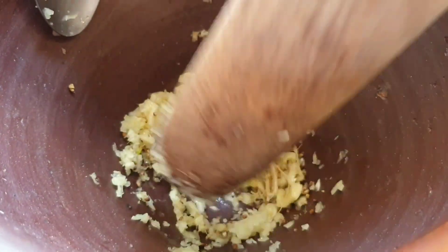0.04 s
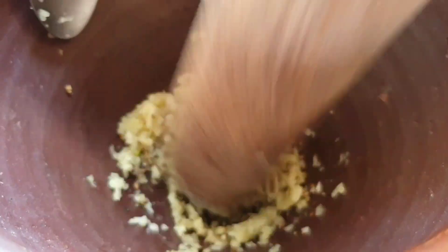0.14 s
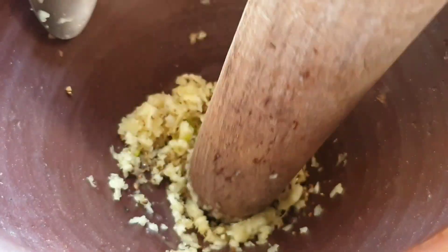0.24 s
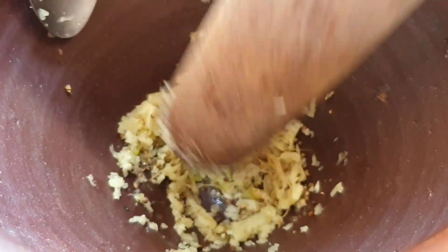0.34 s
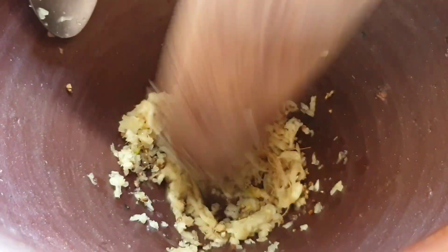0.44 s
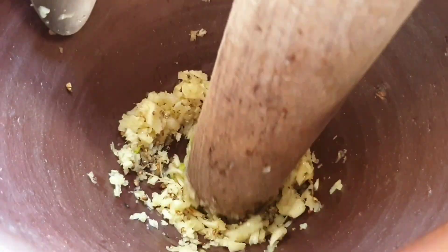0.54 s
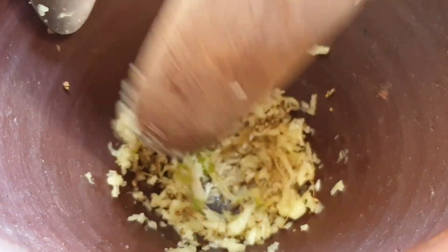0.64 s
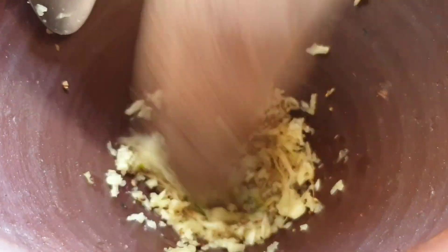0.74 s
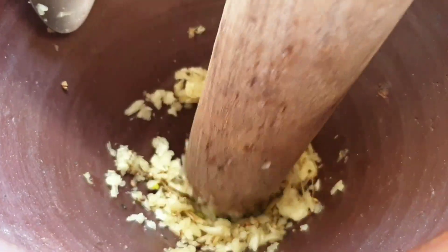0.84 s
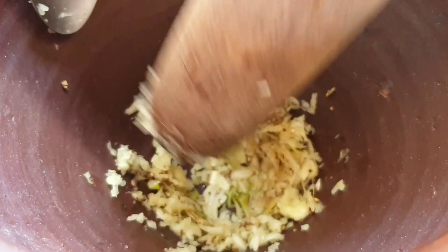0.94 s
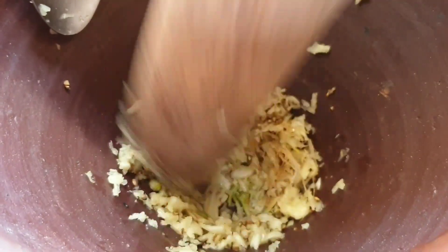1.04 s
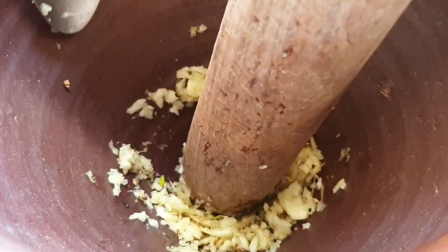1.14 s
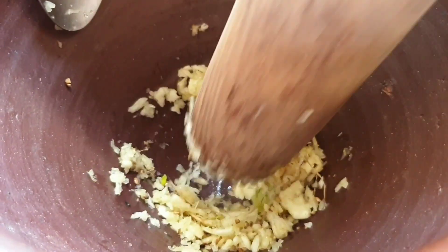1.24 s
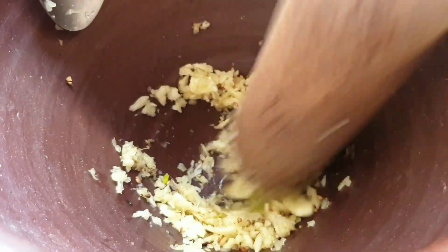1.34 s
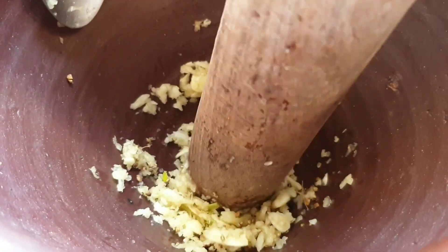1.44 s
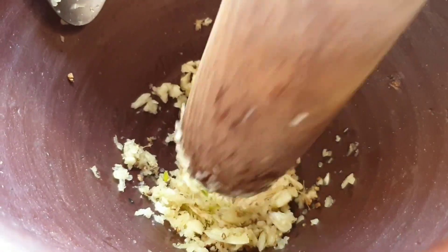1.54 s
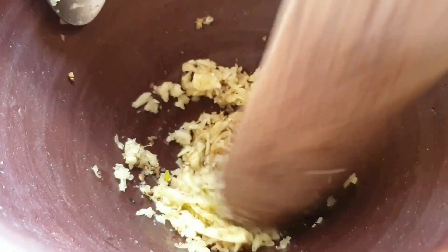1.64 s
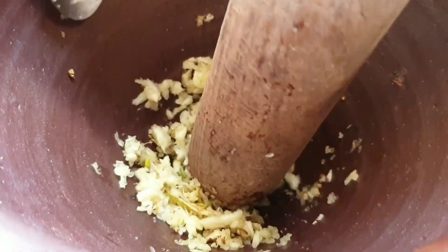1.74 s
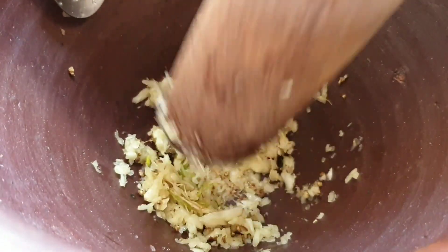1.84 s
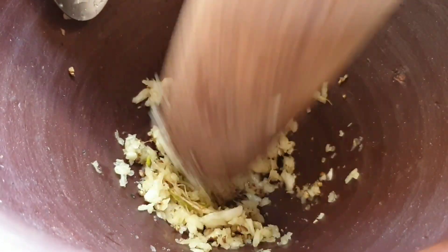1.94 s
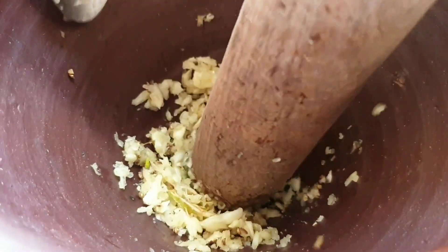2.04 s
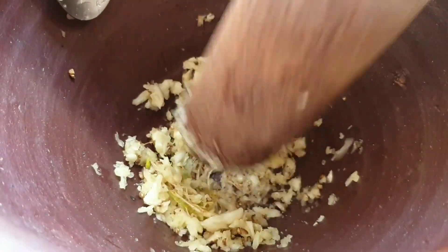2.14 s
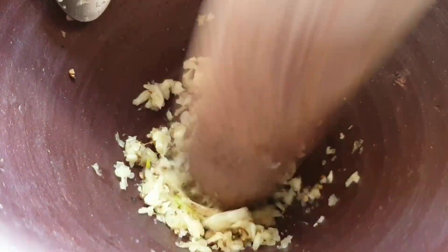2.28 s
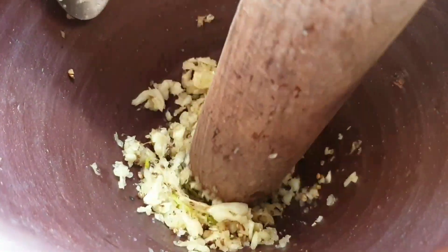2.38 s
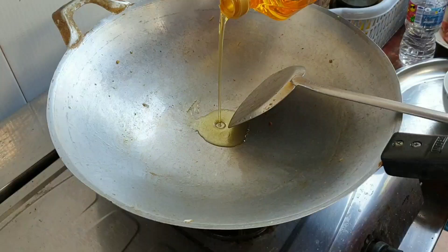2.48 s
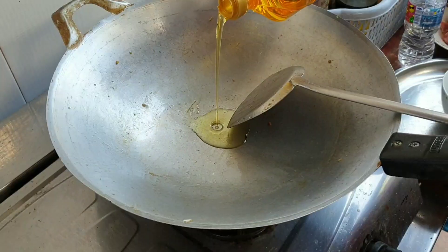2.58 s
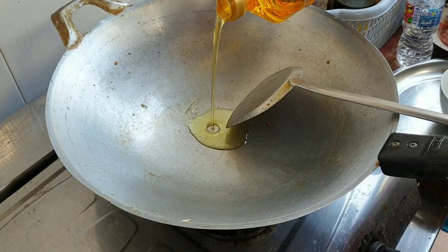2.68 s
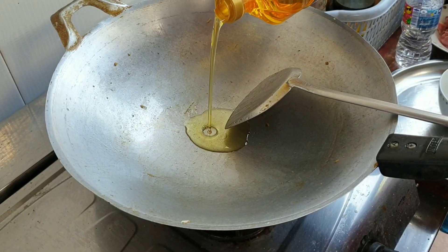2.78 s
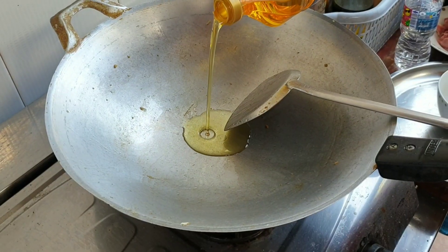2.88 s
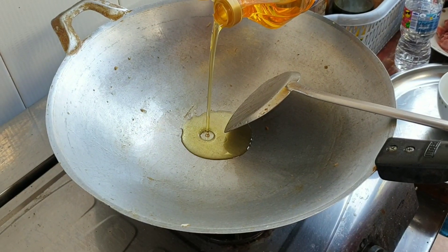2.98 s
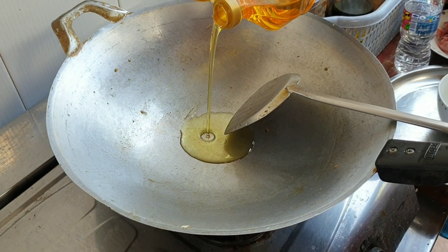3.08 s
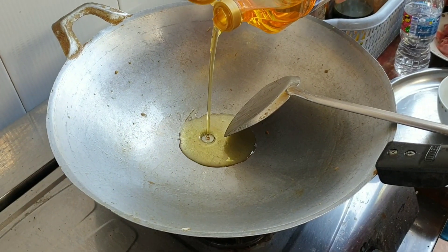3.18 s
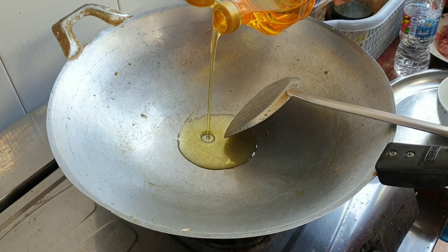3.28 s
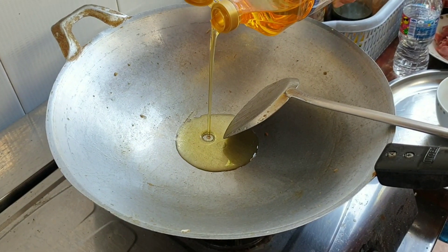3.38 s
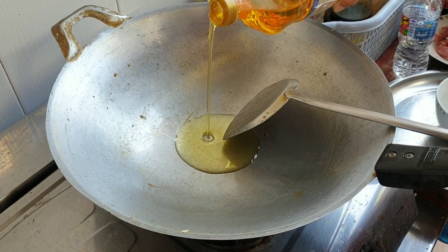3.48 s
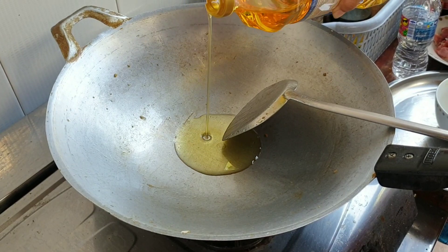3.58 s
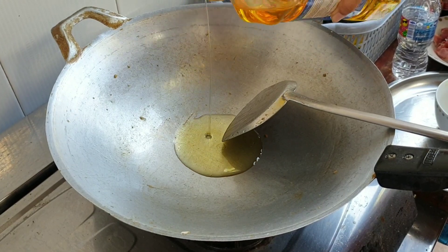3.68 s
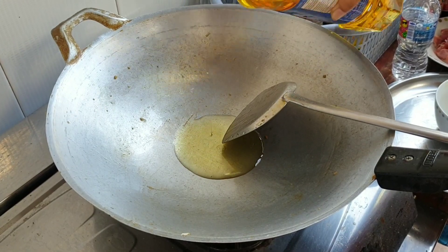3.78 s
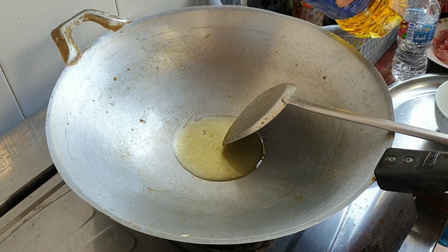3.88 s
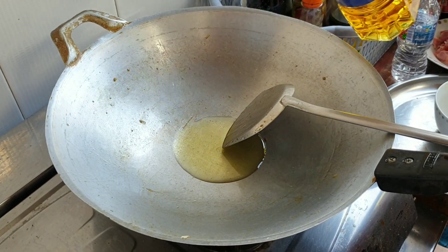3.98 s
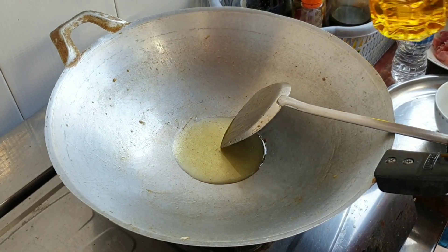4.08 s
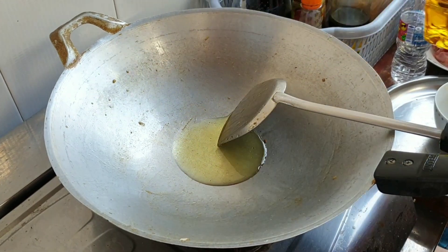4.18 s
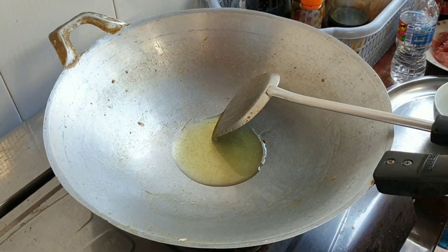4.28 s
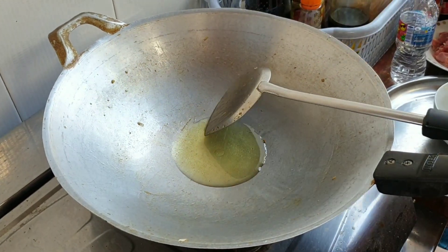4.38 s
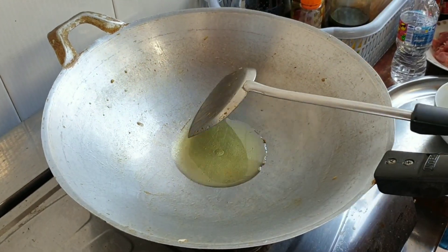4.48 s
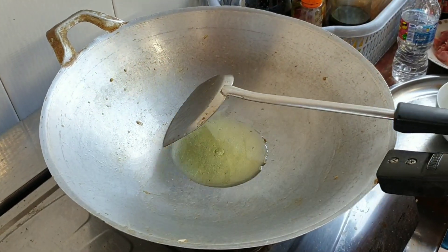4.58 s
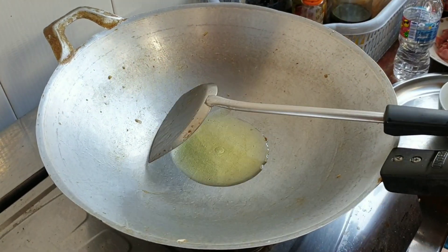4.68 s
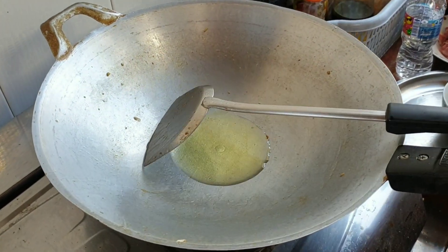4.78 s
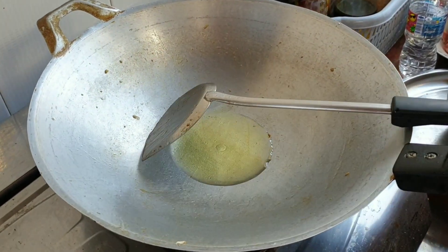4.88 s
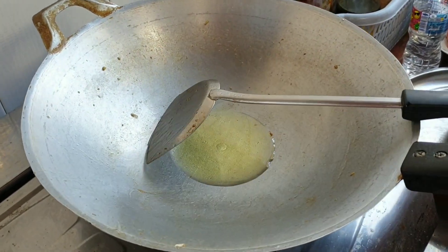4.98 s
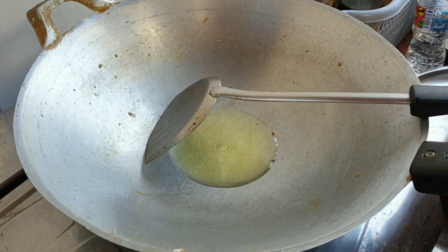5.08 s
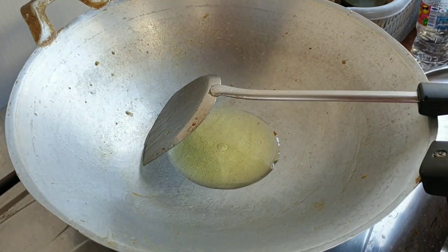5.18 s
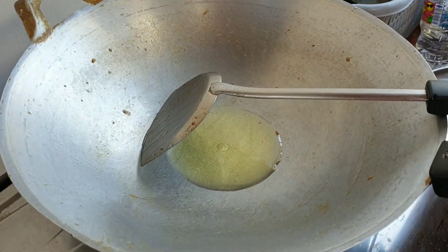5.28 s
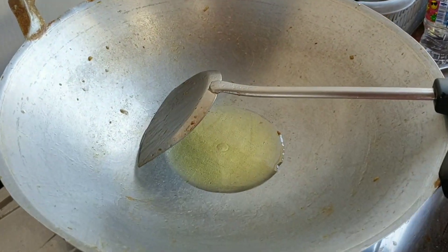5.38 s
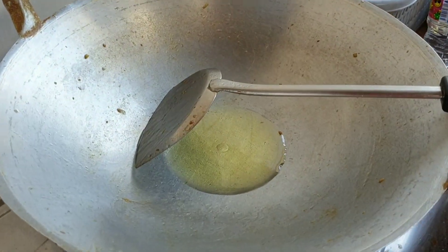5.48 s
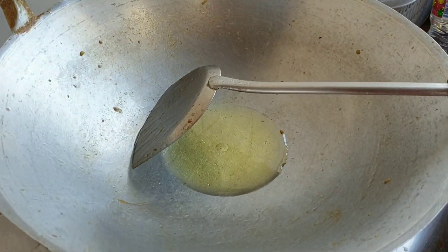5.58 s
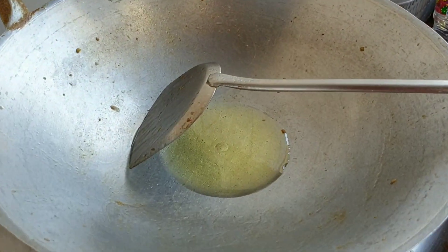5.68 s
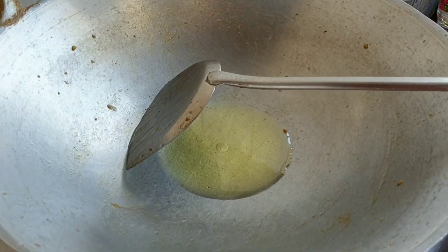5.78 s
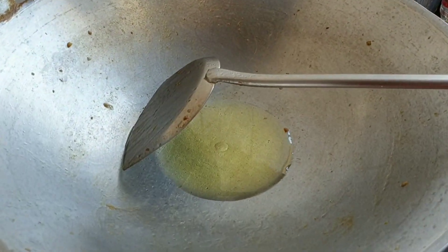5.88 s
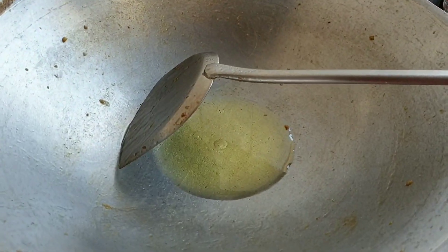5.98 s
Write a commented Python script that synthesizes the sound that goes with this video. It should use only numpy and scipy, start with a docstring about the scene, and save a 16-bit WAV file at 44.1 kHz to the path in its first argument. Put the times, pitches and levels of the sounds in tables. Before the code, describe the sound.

From 0 to 2.5 seconds a wooden pestle pounds garlic in a clay mortar, very close and slightly left, in a short-reverberating kitchen. Nine blows come roughly every 0.3 seconds; those near 0.3, 2.1 and 2.4 are heaviest, the one near 0.6 is soft, and those around 1.2 to 1.8 have a clearer woody knock. Each brings a gritty, wet garlic crackle as the pestle sinks, and a dish often clinks afterwards; a spoon tings at 2.1. Faint bird notes appear near 1.7. At 2.55 a tiny dip cuts to a much quieter scene: low distant traffic, faint motor hum and many short gliding bird whistles echoing outdoors. Small dry ticks and soft brushing on steel cluster around 3.7 to 4.3. A ladle knocks ringingly at 4.8, a double clank on the wok follows at 5.05, birds continue, faint brushing comes near 5.9, and a final double tap lands at 6.0.

```python
"""A crack of garlic and a wooden pestle's thud in a clay mortar come first, close by in an open kitchen.
Blow follows blow: modes of clay and wood ring, bursting pulp crackles, a dish and a spoon clink beside it.
After a cut the same kitchen is heard by a wok: a ladle is taken up, brushes the steel and knocks it.
Small birds whistle gliding notes outside, echoed by hard walls; far traffic is wavering noise with a motor hum."""
import sys
import numpy as np
from scipy import signal
from scipy.fft import rfft, irfft
from scipy.io import wavfile

SR = 44100
rng = np.random.default_rng(int(sys.argv[2]) if len(sys.argv) > 2 else 0)


def unload_audio(sound):
    """Save the sound as a 16-bit wav file, at the path given as the first command line argument."""
    columns = np.transpose(np.atleast_2d(sound))
    # keep every value between -1 and 1, then stretch to whole-number steps
    steps = np.round(np.clip(columns, -1, 1) * 32767)
    wavfile.write(sys.argv[1], SR, steps.astype(np.int16))


N = 265923
T = np.arange(N) / SR   # seconds

# All levels are relative to the mix ahead of the cut's own gain; pan_db is left minus right.
# street, level over time: time_s, rumble_db, air_db
STREET_LEVELS = [(0, -54.5, -73.5), (2.551, -55.5, -64), (2.58, -54.5, -69), (3.5, -58.5, -68),
                 (5.001, -52, -65.5), (6.03, -57, -67.5)]
# spectrum of the far traffic: freq_hz, level_db_per_hz
RUMBLE_SPECTRUM = [(12, -62), (20, -38), (43, -10), (65, 0.5), (87, -14.5), (120, -12.5), (168, -22),
                   (280, -23.5), (343, -29.5), (403, -32.5), (500, -32.5), (650, -72), (1100, -120)]
# spectrum of the street air: freq_hz, level_db_per_hz
AIR_SPECTRUM = [(180, -41.5), (300, -5), (354, -18), (385, -17.5), (842, -5.5), (1080, -6.5), (2210, -12),
                (2610, -49.5), (5900, -40.5), (6740, -21), (16000, -33.5)]
# a far motor: time_s, pitch_hz, level_db
MOTOR_HUM = [(2.599, 148.5, -60), (2.9, 148.3, -57), (3.3, 147.8, -73), (5.2, 150, -59), (5.7, 159.2, -60),
             (6.03, 155.5, -61.5)]
# likeness of left and right in diffuse sound: freq_hz, likeness (1 = the same, 0 = unrelated)
STEREO_LIKENESS = [(60, 0.95), (130, 0.93), (290, 0.85), (640, 0.48), (1410, 0.04), (3100, -0.01),
                   (6820, 0.04), (15000, -0.03)]

# the clearest bird notes: start_s, length_s, first_hz, last_hz, level_db
BIRD_NOTES = [(.924, 0.071, 4930, 4350, -46), (1.356, 0.06, 3670, 4140, -60),
              (1.654, 0.015, 5240, 5570, -50), (1.673, 0.027, 3380, 4425, -36.5),
              (1.712, .057, 3470, 2990, -38), (1.73, .04, 4400, 4230, -45.5),
              (2.552, 0.038, 3970, 3300, -58.5), (2.723, 0.034, 3005, 2930, -57.5),
              (2.732, .11, 5040, 3500, -56.5), (2.791, 0.032, 3280, 2060, -50.5),
              (2.892, 0.09, 2655, 2240, -57), (2.952, 0.044, 6100, 5800, -58),
              (2.982, 0.05, 5460, 4720, -51.5), (3.048, 0.028, 5400, 4820, -42.5),
              (3.109, 0.069, 4690, 4600, -54.5), (3.107, 0.036, 2157, 1767, -53),
              (3.277, 0.03, 2800, 2040, -49.5), (3.725, 0.054, 4984, 4330, -47.5),
              (3.763, 0.026, 4540, 2620, -45), (3.805, 0.057, 3470, 3210, -49),
              (3.899, 0.051, 4750, 3750, -43.5), (3.986, 0.083, 3890, 3070, -51),
              (4.065, 0.039, 6240, 5100, -46), (4.134, 0.035, 5040, 4810, -41),
              (4.183, 0.027, 2580, 2420, -48.5), (4.357, 0.092, 6300, 5850, -52.5),
              (4.45, 0.077, 6010, 5970, -50.5), (4.439, 0.053, 5230, 4260, -54.5),
              (4.533, 0.028, 3680, 2120, -47), (4.622, 0.049, 4640, 4080, -51),
              (4.667, 0.022, 6050, 5830, -48), (4.668, 0.045, 3090, 3835, -47.5),
              (4.732, 0.036, 5590, 4290, -45.5), (4.87, 0.062, 4460, 3370, -46),
              (5.213, 0.057, 5604, 2380, -46.5), (5.293, 0.11, 6090, 5400, -52.5),
              (5.387, 0.04, 4070, 5360, -42.5), (5.669, 0.06, 3030, 5390, -46),
              (5.715, 0.029, 4650, 3210, -40), (5.735, 0.078, 1992, 3936, -45.5),
              (5.83, .052, 4170, 3280, -52)]
# chatter of more birds further off: time_s, level_db
FLOCK_LEVELS = [(0, -70.5), (1.6, -60), (1.9, -70), (2.5, -72), (2.7, -69), (3.0, -57.5), (3.3, -65),
                (3.5, -89.5), (3.7, -75.5), (3.9, -57), (4.3, -82), (4.5, -57), (4.9, -59.5), (5.3, -56.5),
                (5.55, -81), (5.75, -62.5), (6.03, -62)]
ARCH = .1   # mid-note pitch lies above the straight glide by this share of its span
YARD_T60_S, BIRD_DIRECT_DB = .65, -7

# decay of the kitchen: freq_hz, t60_s
KITCHEN_DECAY = [(60, 0.44), (250, 0.57), (1000, 0.43), (4000, 0.34), (12000, 0.22)]
KITCHEN_DB = -11

# ladle on the wok: start_s, ladle_ring_db, wok_ring_db, clank_db, clank_t60_s,
# clank_tilt_db_per_octave, contact_click_db
KNOCKS = [(4.815, -37, -64, -33, 0.24, -1.5, -19), (5.034, -55, -39, -25, 0.15, 4.5, -15),
          (5.065, -58, -36, -35, 0.26, 1.5, -30), (5.998, -68, -44, -25, 0.09, 5, -11),
          (6.010, -60, -40, -32, 0.074, 4, -14)]
# ringing modes of the ladle: freq_hz, level_db, t60_s
LADLE_MODES = [(230, -5, .3), (307, -5, .4), (415, -6, .3), (624, -8, .4), (728, 1, .65), (880, -7, .15),
               (1780, -8, .1), (2239, 0, .19), (2708, -4, .11), (4100, -6, .07), (4700, -4, .04)]
# ringing modes of the wok: freq_hz, level_db, t60_s
WOK_MODES = [(291, -9, .4), (520, -4, .45), (856, -5, .35), (1180, -5, .2), (1453, -4, .35),
             (1300, -3, .06), (1906, -3, .13), (3214, -4, .24), (3941, -8, .2), (4328, -8, .25),
             (5000, -2, .06), (5701, -4, .13)]
# dense modes of the thin steel: freq_hz, level_db_per_hz
CLANK_SPECTRUM = [(88, -36), (150, -8.5), (689, 2), (1630, -8), (2270, -10.5), (2550, -19.5), (3160, -14),
                  (5050, -6), (10600, -37.5), (14500, -36), (16000, -67.5)]
KNOCK_CLICK_HZ = 1300   # centre of the dry click of first contact
# small dry ticks, a bit of garlic cracking in the mortar first, later handling by the wok:
# start_s, level_db, centre_hz
TICKS = [(1.316, -46, 10000), (1.638, -50, 2500), (3.743, -52, 3000), (3.753, -55, 4950),
         (3.843, -41, 3970), (3.925, -48.5, 2300), (4.096, -38.5, 5900), (4.295, -52, 5930),
         (5.934, -44, 4500)]
# hand and ladle brushing over steel: peak_s, level_db, hold_s, extra_treble_db
STROKES = [(3.117, -59, 0.028, 6.5), (4.123, -47.5, 0.042, -5), (4.308, -61, 0.0099, 3),
           (4.537, -70.5, 0.059, 4), (5.068, -43, 0.035, -12.5), (5.386, -73, 0.066, 12),
           (5.9, -59.5, .13, 12.5)]
# colour of the brushing: freq_hz, level_db_per_hz
BRUSH_SPECTRUM = [(88, -23), (150, -5), (291, -3.5), (376, -9), (1940, -17), (5050, -15.5), (6770, -32),
                  (14200, -41), (16000, -67.5)]
STROKE_RISE_DB_PER_S, STROKE_FALL_DB_PER_S = 253, 97.5

# the pestle lands: start_s, thud_db, thud_tilt_db_per_octave, pestle_ring_db,
# ring_tilt_db_per_octave, rattle_db, garlic_crack_db, pan_db
BLOWS = [(.002, -29, -3, -47.5, 0.5, -24, -24, 5.5), (0.2993, -4.5, 2, -39, 15, -16, -16.5, 3.5),
         (.598, -39, 2, -58, 3, -43.5, -28.5, 9), (0.881, -28.5, -5.5, -69, -3, -48, -33.5, 3.5),
         (1.191, -11.5, 3.5, -11, -1.5, -13, -29.5, 4), (1.479, -15, 4, -8, -9, -23.5, -34.5, 3.5),
         (1.779, -17, 1.5, -14, 10, -25, -27, 4.5), (2.110, -4.5, 1, -25, -17, -9.5, -20, 6),
         (2.423, -6, 0, -36, 2.5, -10.5, -19.5, 5)]
# then it sinks through the pulp: loudest_squelch_s, squelch_db, squelch_t60_s, bottom_thud_db,
# bottom_thud_tilt_db_per_octave, pan_db
SINKS = [(.03, -47.5, .1, -29, 0, 11), (.320, -47.5, 0.083, -33.5, 0, 7), (.610, -26.5, 0.033, -20, 2, 5.5),
         (.899, -28, .052, -23, 2, 8.5), (1.205, -20, 0.045, -18, 3, 3.5),
         (1.516, -31.5, 0.08, -31.5, 0, 9.5), (1.802, -22, 0.063, -18, 0, 5),
         (2.125, -27.5, 0.11, -16, 2, 2), (2.446, -41.5, 0.33, -22, 2, 0.5)]
# spectrum of the crackling pulp, used for the dish rattle too: freq_hz, level_db_per_hz
PULP_SPECTRUM = [(590, -36.5), (1000, -7), (2310, -13), (2560, -7.5), (3050, -7.5), (3300, -8), (4260, -4),
                 (5310, -8), (8360, -14), (10900, -8), (16000, -22.5)]
CRACK_RISE_S, CRACK_T60_S = 0.0018, 0.042   # rise = time for the last 20 dB, for a 0 dB thud
RISE_S_PER_DB = .00025   # softer blows crack more slowly
SQUELCH_RISE_SHARE = 0.56   # of the time the sinking takes
# mortar and the table under it: freq_hz, level_db, t60_s
MORTAR_MODES = [(58.3, -8.5, 0.11), (105.8, -1, 0.079), (124.5, -8, .28), (184.7, -6, 0.075),
                (293.3, -4, 0.11), (317.5, -19, 0.2), (386, -7.5, 0.041), (461, -9, 0.22),
                (502.6, 4, 0.061), (636.6, -7, 0.031), (847, -5.5, 0.0073)]
# bending modes of the pestle: freq_hz, level_db, t60_s
PESTLE_MODES = [(1174, 0, .09), (1160, -22, .28), (1270, -3, .05), (1100, -8, .05), (1012, -16, .15),
                (1368, -6, .06), (2081, -16, .06), (3239, -10, .08)]
# dense small modes of table and pulp, heard as a dying thump: freq_hz, level_db_per_hz
THUMP_SPECTRUM = [(24, -37.5), (40, -3.5), (470, -4), (637, -14.5), (880, -6), (1430, -18), (1580, -13.5),
                  (2620, -18.5), (4170, -36), (5000, -20.5), (6500, -51), (11000, -120)]
THUMP_DB, THUMP_T60_S = -1.5, .15
CONTACT_CUT_HZ, BOTTOM_CUT_HZ = 860, 650   # softness of landing and of touching the bottom
BOTTOM_LAG_S, BOTTOM_RATTLE_DB = .007, -9.5   # after the squelch; under the thud
MUFFLE_DB, MUFFLE_S = -18, 0.0071   # the pulp damps the pestle's ring once it is in
# the dish hops after a blow and lands: start_s, level_db, tilt_db_per_octave, pan_db
CLINKS = [(0.048, -36.5, -3.5, 2), (0.3665, -33, 5, 8), (.672, -36, 3, -7.5), (.972, -38, 1.5, 11.5),
          (2.489, -33, 2.5, 9.5)]
# ringing modes of the dish: freq_hz, level_db, t60_s
DISH_MODES = [(1022, -5.5, 0.28), (2060, -4, .06), (2636, -4, .13), (2718, -0.5, 0.058), (2653, -12, 0.22),
              (3340, -4, 0.057), (4340, -13, 0.13), (4500, -17, 0.14), (4460, -14, 0.17), (5100, 2, 0.023),
              (6180, -10.5, 0.054), (6000, -10.5, .04)]
DISH_RATTLE_DB, DISH_RATTLE_T60_S = -7, 0.044   # rough chatter of the landing dish
# ringing modes of the spoon: freq_hz, level_db, t60_s
SPOON_MODES = [(4787, 0, .14), (6132, -4, .11), (7655, -12, .07), (11173, -6, .09)]
SPOON_S, SPOON_DB = 2.125, -25.5   # the spoon jumps once

SCATTER_DB = 2   # no two blows excite the modes alike
RIGHT_LAG_S = .0003   # the two microphones are a hand apart
CUT_S, RESUME_S = 2.551, 2.578
CUTOFF_HZ = 16300


def amp(db):
    """dB to gain."""
    return 10 ** (np.asarray(db) / 20)


def rms_one(x):
    """Scale to rms 1."""
    return x / np.sqrt(np.mean(x ** 2) + 1e-20)


def at_hz(points, hz):
    """Read a frequency table on a log axis."""
    at, value = np.transpose(points)
    return np.interp(np.log(np.maximum(hz, 1)), np.log(at), value)


def colour(x, spectrum):
    """Weight the frequencies of x by a spectrum table."""
    n = x.shape[-1]
    gain = amp(at_hz(spectrum, np.fft.rfftfreq(n, 1 / SR)))
    return irfft(rfft(x) * gain, n)


def diffuse(n):
    """White stereo noise, alike in the bass and unrelated in the treble."""
    mid, side = rfft(rng.standard_normal((2, n)))
    alike = np.clip(at_hz(STEREO_LIKENESS, np.fft.rfftfreq(n, 1 / SR)), -1, 1)
    return irfft(np.sqrt(1 + alike) * mid + np.sqrt(1 - alike) * side * [[1], [-1]], n)


def drift(rate_hz):
    """Slow random wander of spread 1, drawn as 40 knots per second."""
    knots = rng.standard_normal(int(T[-1] * 40) + 2)
    r = np.exp(-2 * np.pi * rate_hz / 40)
    wander = rms_one(signal.lfilter([1], [1, -r], knots))
    return np.interp(T * 40, np.arange(len(knots)), wander)


def add(out, x, s, pan_db=0, lag_s=0):
    """Place a near sound: louder on one side and later on the right."""
    for side, (lag, gain) in enumerate([(0, amp(pan_db / 2)), (lag_s, amp(-pan_db / 2))]):
        i = round((s + lag) * SR)
        out[side, i:i + len(x)] += gain * x[:N - i]


def strike(force, modes, tilt_db=0, rise_s=1e-4):
    """A force history rings decaying modes, each with a strength of its own; wood takes a moment to speak."""
    t = T[:SR // 2]
    chance = rng.standard_normal(len(modes))
    body = 0
    for (hz, db, t60), c in zip(modes, chance):
        level_db = db + tilt_db * np.log2(hz / 2000) + SCATTER_DB * c
        body = body + amp(level_db - 60 * t / t60) * np.sin(2 * np.pi * hz * t)
    return signal.fftconvolve(force, body * np.clip(t / rise_s, 0, 1))


def contact(rattle_db, t60, cut_hz):
    """Force of one soft push followed by dying uneven re-contacts."""
    t = T[:SR // 4]
    touching = rng.random(len(t)) < .03
    force = amp(rattle_db - 60 * t / t60) * rng.standard_normal(len(t)) * touching
    force[0] = 1
    r = np.exp(-2 * np.pi * cut_hz / SR)
    return signal.lfilter([(1 - r) ** 2], [1, -2 * r, r * r], force)


def dying(spectrum, t60, tilt_db=0):
    """Modes too dense to tell apart: coloured noise that rises within 2 ms and dies."""
    t = T[:SR // 2]
    tilted = [(hz, db + tilt_db * np.log2(hz / 1000)) for hz, db in spectrum]
    noise = rms_one(colour(rng.standard_normal(len(t)), tilted))
    return noise * amp(-60 * t / t60) * np.clip(t / 0.0017, 0, 1)


def tick(hz):
    """A short dry puff of dying noise, two octaves wide."""
    puff = rng.standard_normal(400) * amp(-60 * T[:400] / 0.0091)
    return signal.sosfilt(signal.butter(1, [hz / 2, hz * 2], "band", fs=SR, output="sos"), puff)


def background():
    """Far off: wavering traffic rumble, a motor hum and the air of the street."""
    s, rumble_db, air_db = np.transpose(STREET_LEVELS)
    rumble_gain = amp(np.interp(T, s, rumble_db) + 0.62 * drift(4))
    rumble = rumble_gain * rms_one(colour(diffuse(N), RUMBLE_SPECTRUM))
    air_gain = amp(np.interp(T, s, air_db) + 0.89 * drift(3))
    air = air_gain * rms_one(colour(diffuse(N), AIR_SPECTRUM))
    s, hz, db = np.transpose(MOTOR_HUM)
    phase = 2 * np.pi * np.cumsum(np.interp(T, s, hz)) / SR
    hum = amp(np.interp(T, s, db, left=-120) + drift(17)) * np.sin(phase)
    return (rumble + air + hum) * amp([[1.3], [-1.3]])


def whistle(length_s, first_hz, middle_hz, last_hz):
    """One gliding, hoarse bird note: pitch and strength both tremble."""
    u = np.linspace(0, 1, round(length_s * SR))
    glide_hz = np.polyval(np.polyfit([0, .5, 1], [first_hz, middle_hz, last_hz], 2), u)
    slow = signal.butter(3, 500, fs=SR, output="sos")
    tremble = signal.sosfilt(slow, rng.standard_normal((2, SR // 4)))
    pitch, strength = rms_one(tremble)[:, -len(u):]
    phase = 2 * np.pi * np.cumsum(glide_hz * (1 + .032 * pitch)) / SR
    return np.sin(np.pi * u) * (1 + .35 * strength) * np.sin(phase)


def yard():
    """Hard walls outside: two decays of noise, apart left and right, with the direct sound ahead."""
    t = T[:SR]
    echo = rng.standard_normal((2, SR)) * (amp(-60 * t / YARD_T60_S) + amp(-4.5 - 60 * t / 0.22))
    echo /= np.sqrt(np.sum(echo ** 2, axis=1, keepdims=True))
    echo[[0, 1], [0, 9]] += amp(BIRD_DIRECT_DB)   # nine samples later on the right
    return echo


def birds():
    """Near notes and a far chattering flock, mostly heard by their echoes between walls."""
    near, far = np.zeros((2, N + SR))
    for s, length_s, first_hz, last_hz, db in BIRD_NOTES:
        middle_hz = (first_hz + last_hz) / 2 + ARCH * abs(last_hz - first_hz)
        note = amp(db) * whistle(length_s, first_hz, middle_hz, last_hz)
        near[round(s * SR):][:len(note)] += note
    for when, pitch, fall in rng.random((900, 3)):   # when = share of the whole length
        hz = 2300 + 4200 * pitch
        note = whistle(0.077, hz, hz * (1 - 0.13 * fall), hz * (1 - .3 * fall))
        far[round(when * N):][:len(note)] += note
    flock = amp(np.interp(T, *np.transpose(FLOCK_LEVELS))) * rms_one(far[:N])
    calls = near[:N] + flock
    return signal.fftconvolve(calls[None], yard(), axes=1)[:, :N] * amp([[.5], [-.5]])


def kitchen(x):
    """Reverberation of the left channel: octave bands of diffuse noise, each dying at its own rate."""
    noise, t, tail = diffuse(SR), T[:SR], 0
    for hz in 31.25 * 2. ** np.arange(9):
        octave = signal.butter(2, [hz, min(2 * hz, .45 * SR)], "band", fs=SR, output="sos")
        t60 = at_hz(KITCHEN_DECAY, 1.6 * hz)
        even = np.sqrt(t60 * SR / np.log(1e6))   # so a long decay carries no extra energy
        tail = tail + signal.sosfilt(octave, noise) * amp(-60 * t / t60) / even
    tail *= np.clip(t / 0.017, 0, 1)   # first reflections take a few ms
    return signal.fftconvolve(x[[0]], tail, axes=1)[:, :N]


def brushing():
    """A hand and the ladle over steel: grainy noise that swells and fades with each stroke."""
    grain_gain = amp(3 * np.minimum(rng.exponential(1, N // 128 + 1), 4)).repeat(128)[:N]
    brush = rms_one(colour(diffuse(N) * grain_gain, BRUSH_SPECTRUM))
    treble = signal.sosfilt(signal.butter(2, 7000, "high", fs=SR, output="sos"), brush)
    out = np.zeros((2, N))
    for s, db, hold_s, treble_db in STROKES:
        rise_db = STROKE_RISE_DB_PER_S * np.maximum(s - T, 0)
        fall_db = STROKE_FALL_DB_PER_S * np.maximum(T - s - hold_s, 0)
        out += amp(db - rise_db - fall_db) * (brush + amp(treble_db) * treble)
    return out


def ladle():
    """Knocks ring ladle and wok, with a dense clank and a contact click; small dry ticks and brushing join."""
    out = np.zeros((2, N))
    for s, ladle_db, wok_db, clank_db, t60, tilt_db, click_db in KNOCKS:
        rings = amp(ladle_db) * strike([1], LADLE_MODES) + amp(wok_db) * strike([1], WOK_MODES)
        clank = amp(clank_db) * dying(CLANK_SPECTRUM, t60, tilt_db)
        add(out, rings + clank, s, 1.5, .0001)
        add(out, amp(click_db) * tick(KNOCK_CLICK_HZ), s, 1.5, .0001)
    for s, db, hz in TICKS:   # the garlic in the mortar first, later handling by the wok
        add(out, amp(db) * tick(hz), s)
    return out + brushing()


def clinking():
    """The dish lands ringing and rattling after a blow; the spoon rings once."""
    out = np.zeros((2, N))
    for s, db, tilt_db, pan_db in CLINKS:
        ring = strike(contact(-8, .015, 9000), DISH_MODES, tilt_db)
        rattle = dying(PULP_SPECTRUM, DISH_RATTLE_T60_S)
        add(out, amp(db) * ring, s, pan_db, RIGHT_LAG_S)
        add(out, amp(db + DISH_RATTLE_DB) * rattle, s, pan_db, RIGHT_LAG_S)
    add(out, amp(SPOON_DB) * strike([1], SPOON_MODES), SPOON_S, 3, RIGHT_LAG_S)
    return out


def garlic():
    """Bursting cells: dense uneven clicks, a crack as the pestle lands and a slower squelch as it sinks in."""
    sizes = amp(2.2 * np.minimum(rng.exponential(1, N), 4)) * rng.choice([-1, 1], N)
    crackle = rms_one(colour(sizes * (rng.random(N) < .15), PULP_SPECTRUM))
    bursts = []
    for s, thud_db, *_, crack_db, pan_db in BLOWS:
        rise_s = CRACK_RISE_S + RISE_S_PER_DB * abs(thud_db)
        bursts.append((s, crack_db, rise_s, CRACK_T60_S, pan_db))
    for (s, db, t60, *_, pan_db), (landed_s, *_) in zip(SINKS, BLOWS):
        bursts.append((s, db, SQUELCH_RISE_SHARE * (s - landed_s), t60, pan_db))
    out = np.zeros((2, N))
    lead_s = .04   # each burst swells up ahead of its peak
    t = T[:SR // 3] - lead_s
    for s, db, rise_s, t60, pan_db in bursts:
        i = round(max(s - lead_s, 0) * SR)
        skipped = i - round((s - lead_s) * SR)   # samples that would fall before the start
        swell = amp(db + np.where(t < 0, 20 * t / rise_s, -60 * t / t60))[skipped:]
        add(out, swell * crackle[i:i + len(swell)], i / SR, pan_db, RIGHT_LAG_S)
    return out


def pounding():
    """Each blow, and each touch of the bottom, thuds through mortar and table; blows ring the pestle."""
    out = np.zeros((2, N))
    shove = np.sin(np.pi * np.linspace(0, 1, SR // 400)) ** 2   # the bowl jolts the air once
    thuds = []
    for s, db, tilt_db, _, _, rattle_db, _, pan_db in BLOWS:
        thuds.append((s, db, tilt_db, rattle_db, CONTACT_CUT_HZ, pan_db))
    for s, _, _, db, tilt_db, pan_db in SINKS:
        thuds.append((s + BOTTOM_LAG_S, db, tilt_db, db + BOTTOM_RATTLE_DB, BOTTOM_CUT_HZ, pan_db))
    for s, thud_db, tilt_db, rattle_db, cut_hz, pan_db in thuds:
        modes = [(hz, db + tilt_db * np.log2(hz / 300), t60) for hz, db, t60 in MORTAR_MODES]
        thud = strike(contact(rattle_db - thud_db, 0.1, cut_hz), modes)
        thump = dying(THUMP_SPECTRUM, THUMP_T60_S)
        add(out, amp(thud_db - 12.0) * thud, s, pan_db + 1.8, .00007)
        add(out, amp(thud_db - 11.5) * shove, s, pan_db + 0.2, .00007)
        add(out, amp(rattle_db + THUMP_DB) * thump, s, pan_db, .00015)
    for (s, _, _, ring_db, tilt_db, *_), (sunk_s, *_) in zip(BLOWS, SINKS):
        ring = strike(contact(-20, .03, 4000), PESTLE_MODES, tilt_db, rise_s=.002)
        muffle_db = MUFFLE_DB * np.clip((T[:len(ring)] + s - sunk_s) / MUFFLE_S, 0, 1)
        add(out, amp(ring_db + muffle_db) * ring, s, 4.5, RIGHT_LAG_S)
    return out


def scene():
    """Mortar and its echo end at the cut; after a short deep dip the whole level resumes higher, by the wok."""
    mortar = pounding() + clinking() + garlic()
    wok = ladle()
    before_cut = T < (CUT_S + RESUME_S) / 2
    mortar_heard = (mortar + amp(KITCHEN_DB) * kitchen(mortar)) * before_cut
    wok_heard = wok + amp(KITCHEN_DB) * kitchen(wok)
    sound = mortar_heard + wok_heard + birds() + background()
    gap_db = np.interp(T, [CUT_S, CUT_S + 0.0031, RESUME_S - .002, RESUME_S], [-1, -25, -27, 5.5])
    return sound * amp(gap_db)


def record(dry):
    """Bass roll-off, gentle then steep top cut, and clipped peaks."""
    x = signal.sosfilt(signal.butter(4, 38, "high", fs=SR, output="sos"), dry)
    x = signal.sosfilt(signal.butter(1, 15000, fs=SR, output="sos"), x)
    x = signal.sosfilt(signal.cheby2(12, 70, CUTOFF_HZ, fs=SR, output="sos"), x)
    return np.clip(x, -1, 1)


dry = scene()
out = record(dry)
unload_audio(out)
```